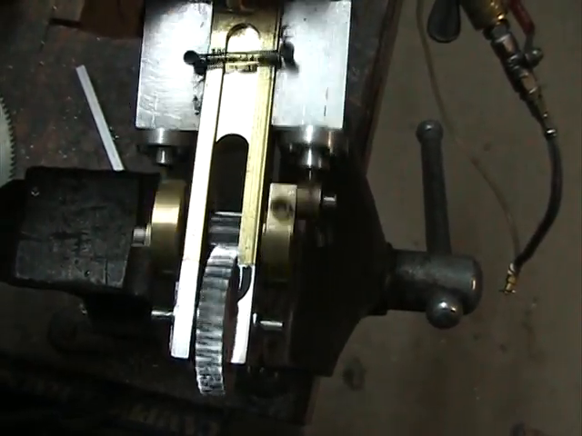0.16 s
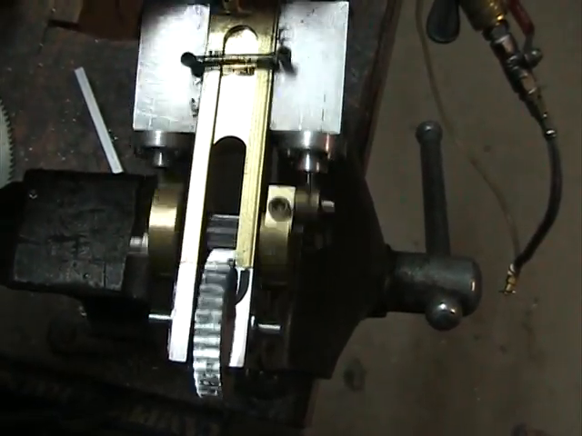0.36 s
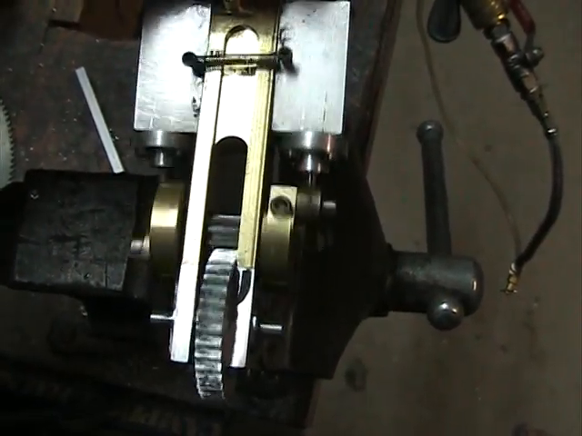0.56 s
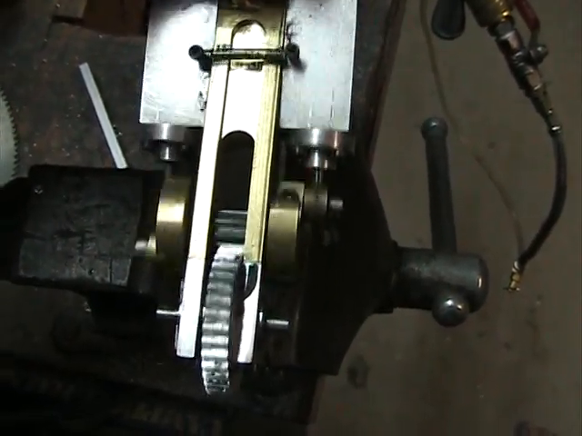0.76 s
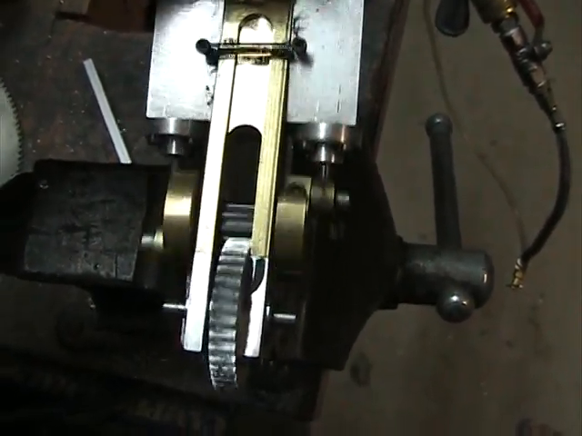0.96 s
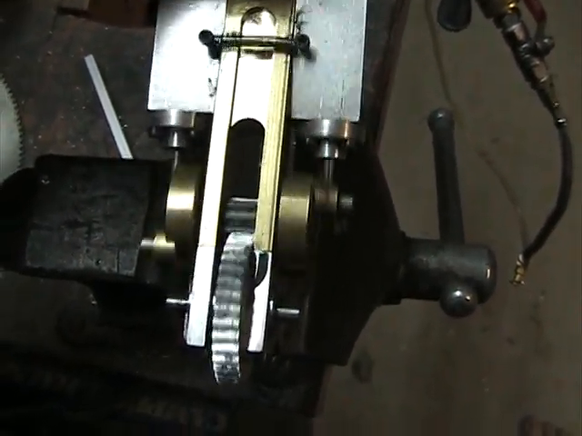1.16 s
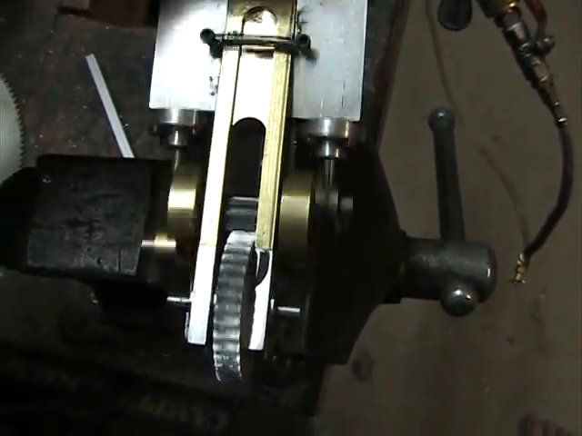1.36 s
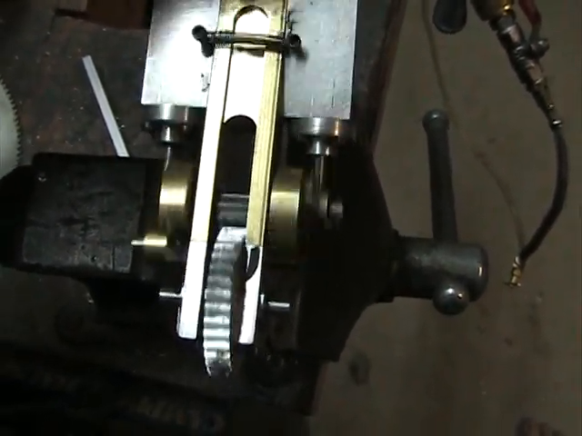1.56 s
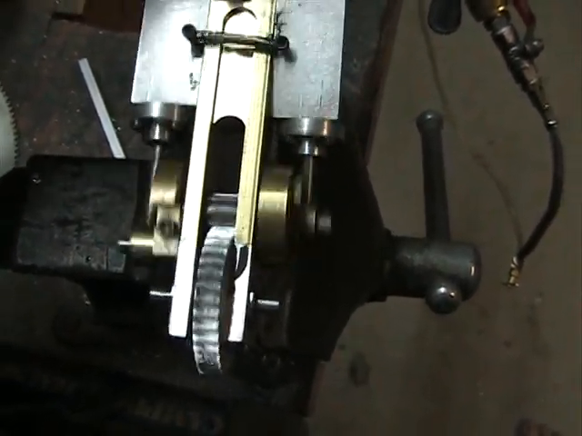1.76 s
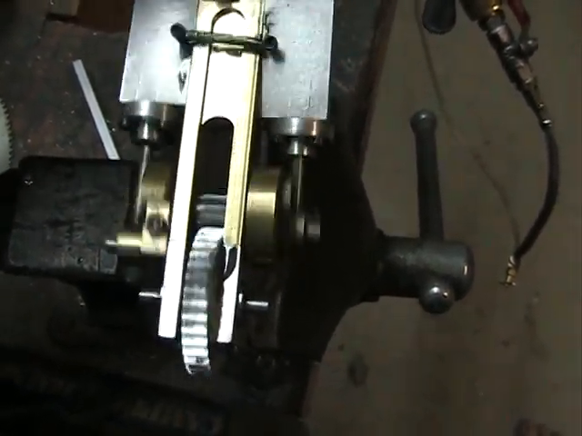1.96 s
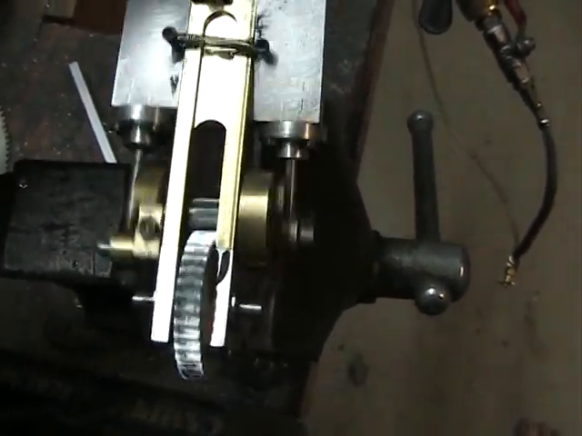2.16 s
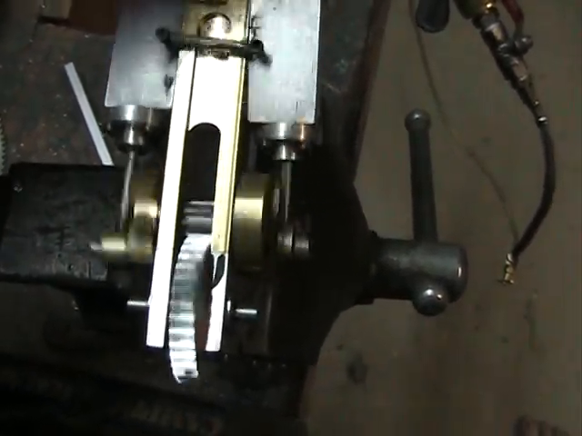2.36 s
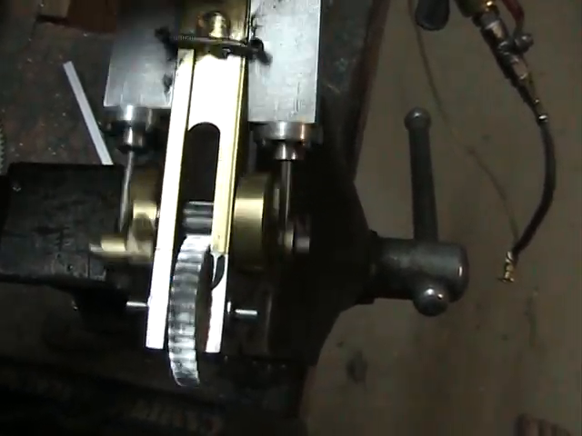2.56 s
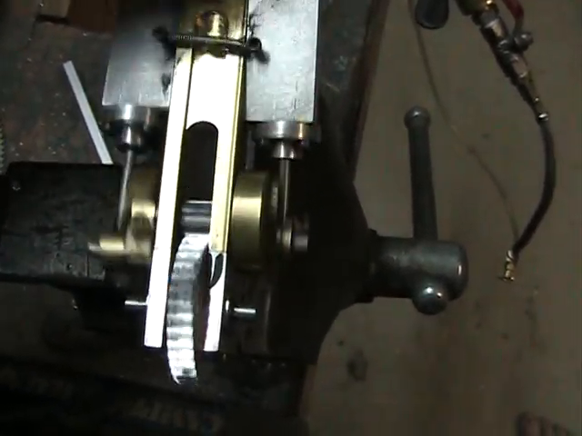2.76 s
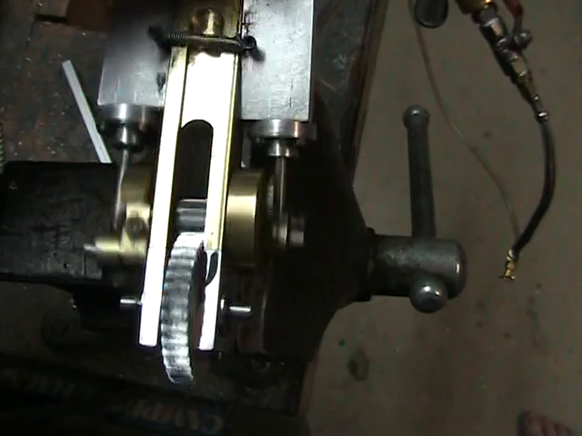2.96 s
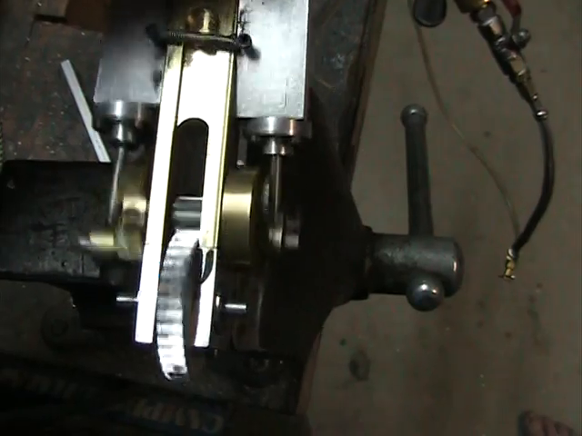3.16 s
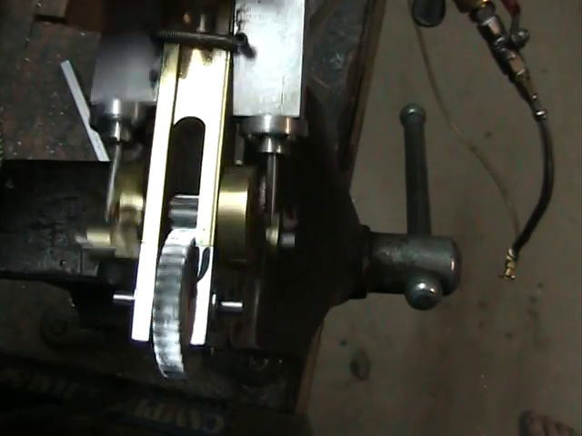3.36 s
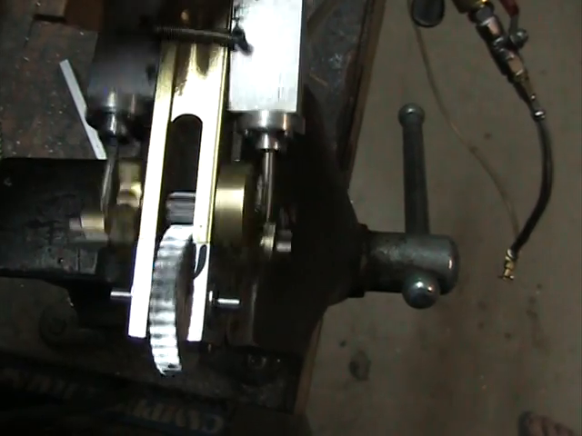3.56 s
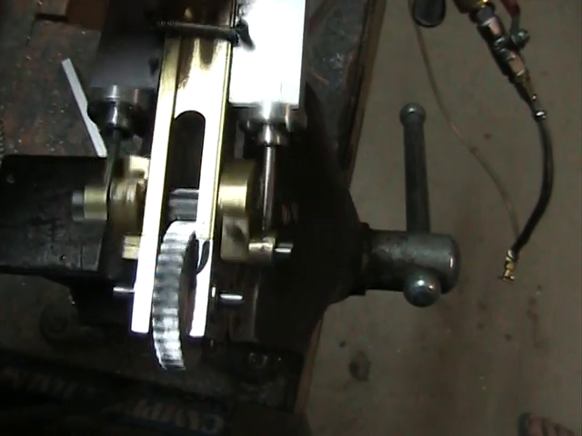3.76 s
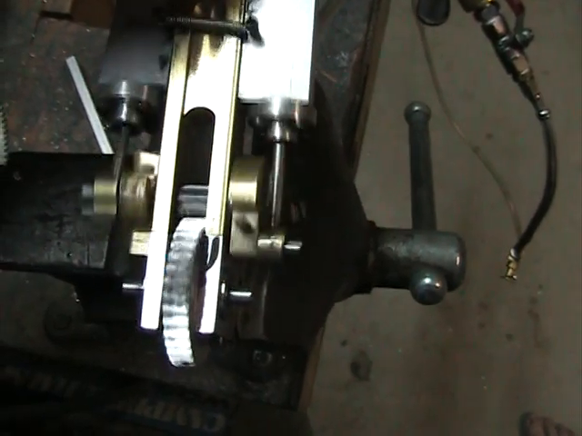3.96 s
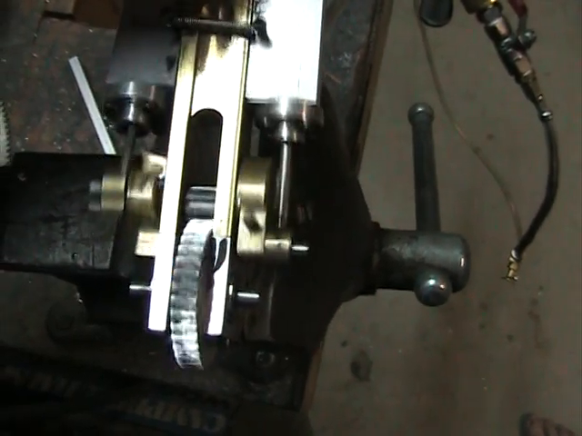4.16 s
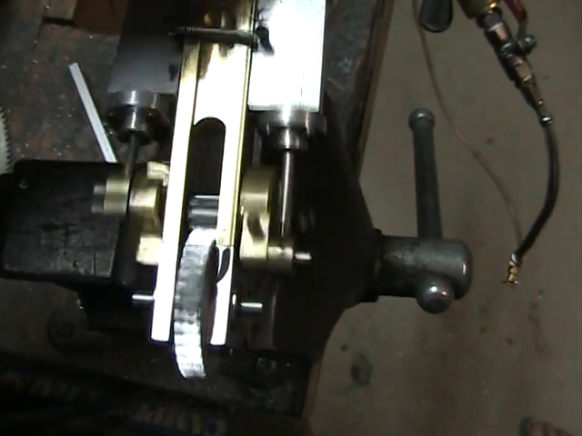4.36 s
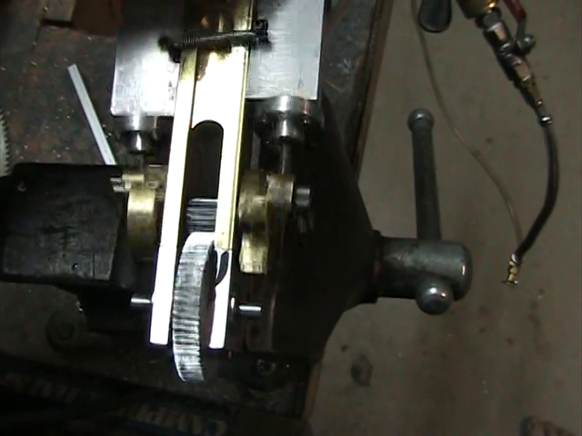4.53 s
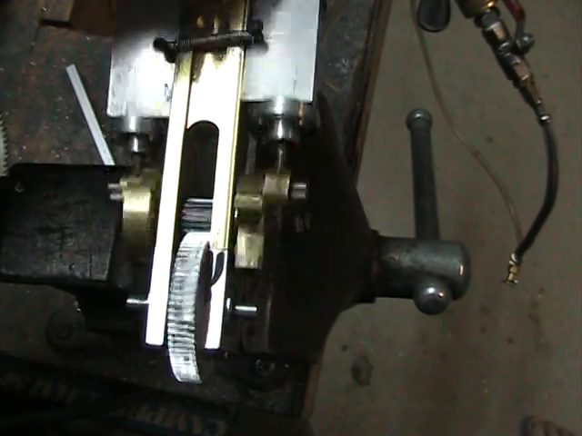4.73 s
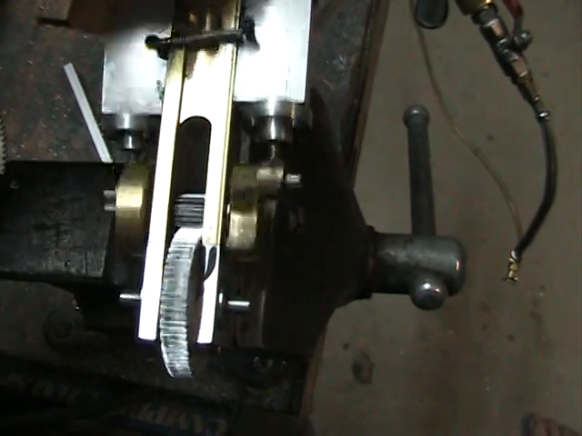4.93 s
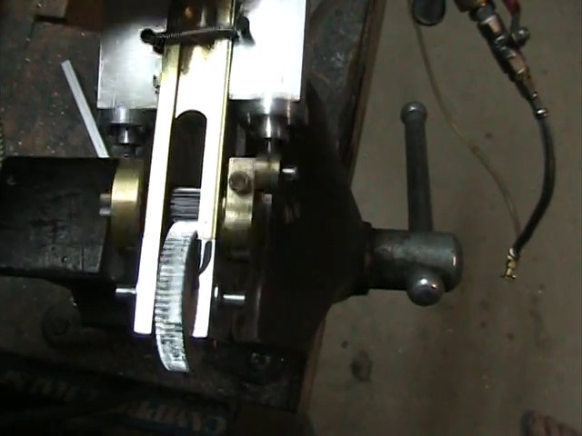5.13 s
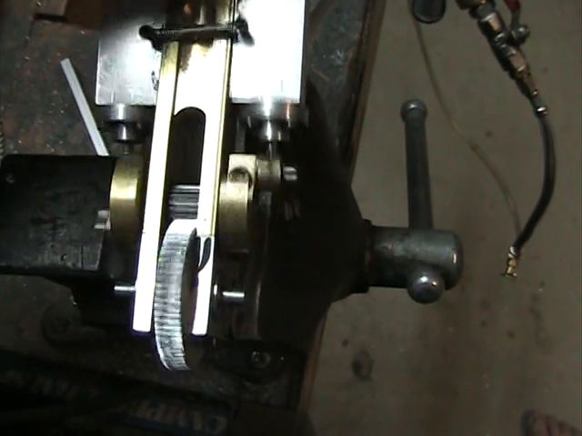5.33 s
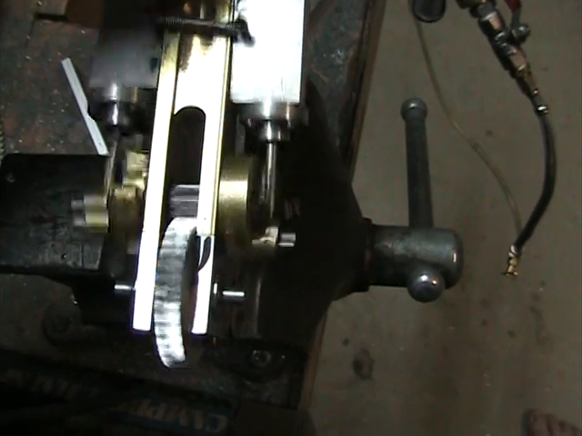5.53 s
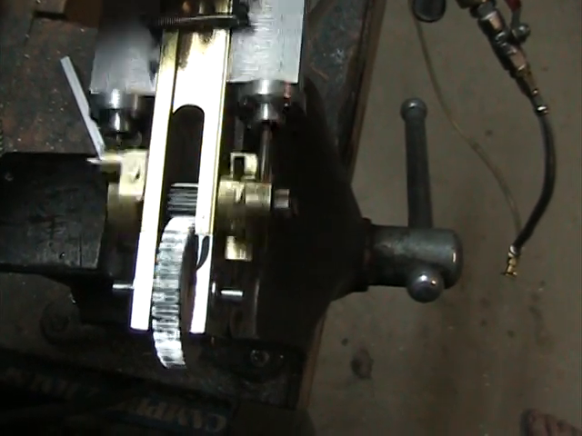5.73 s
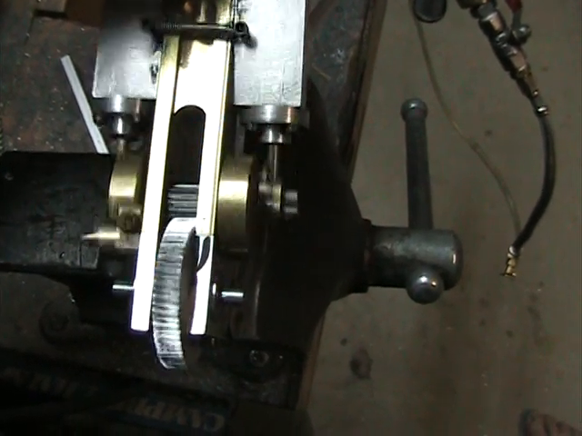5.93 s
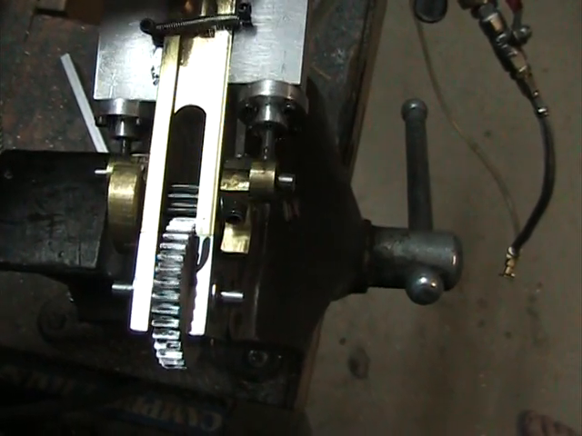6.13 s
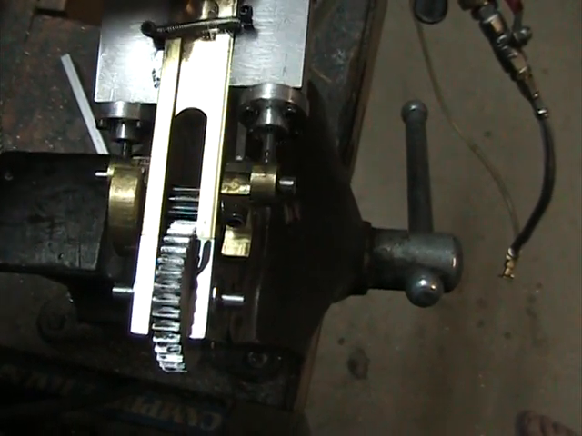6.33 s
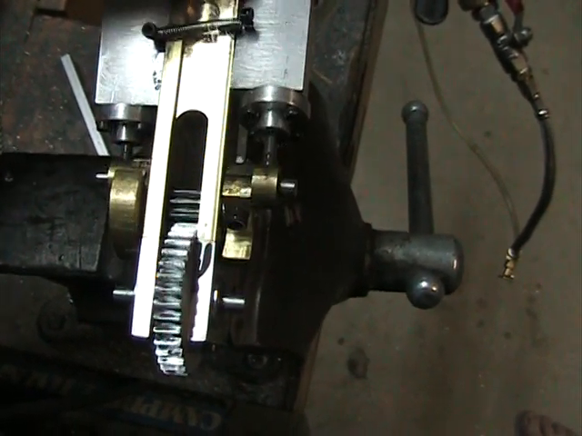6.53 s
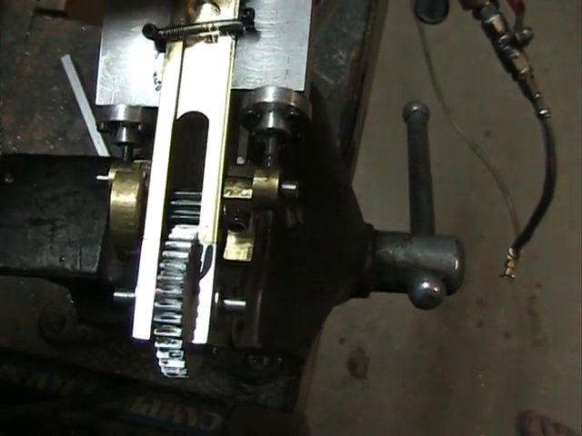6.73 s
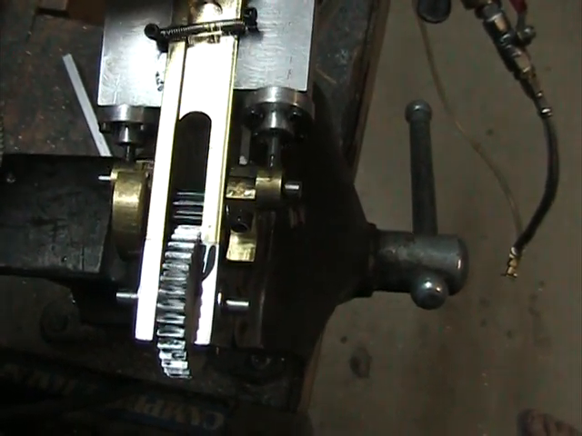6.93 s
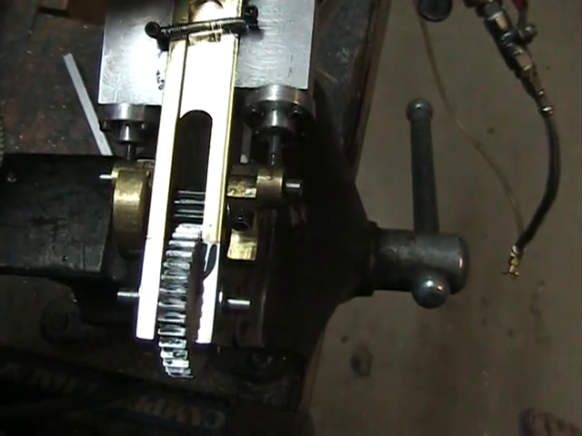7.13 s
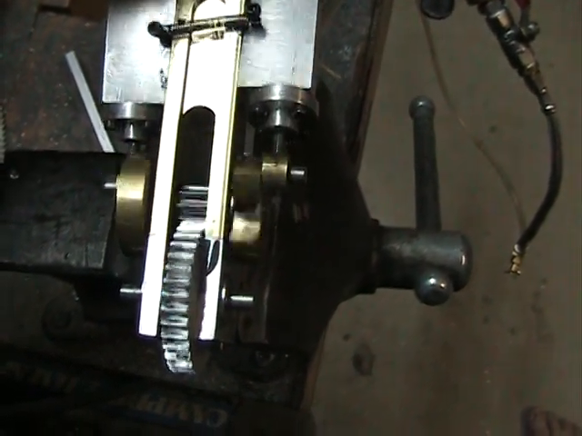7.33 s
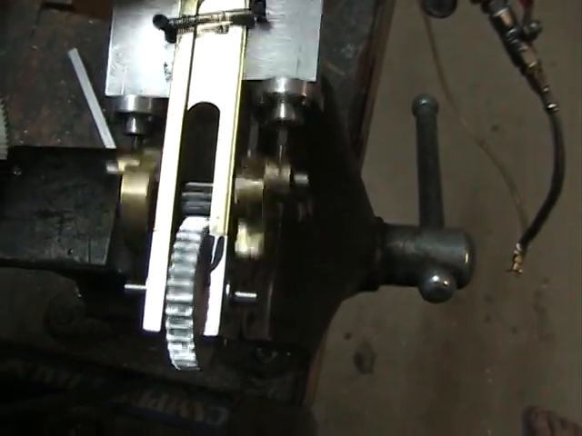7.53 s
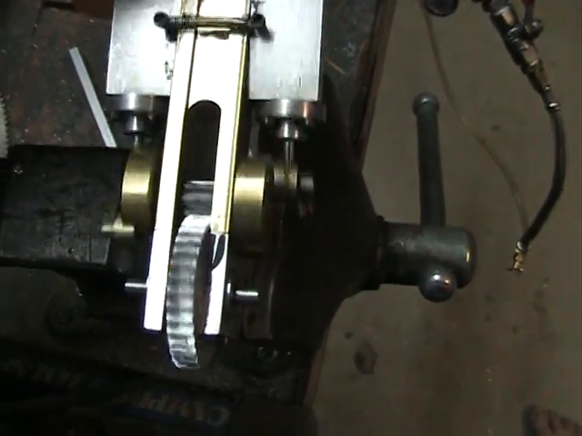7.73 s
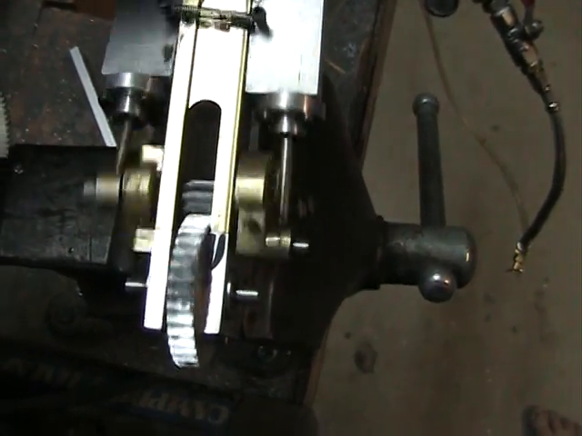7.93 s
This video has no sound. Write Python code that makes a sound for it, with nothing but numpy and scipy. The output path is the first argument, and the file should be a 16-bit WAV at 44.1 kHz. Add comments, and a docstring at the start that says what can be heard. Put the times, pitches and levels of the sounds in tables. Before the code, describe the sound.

A small engine runs on compressed air with rapid clacking and hissing, stalls briefly, then restarts with a louder hiss.

```python
"""A small twin-cylinder model engine, held in a vice in a humming workshop, runs on compressed air.
Air hisses from the valves; four strokes a turn drive the gear teeth through their backlash, so they
clack and thump the frame, and once a turn the engine rocks in the vice. Airy whistles come and go.
Near 6 s the air is turned down and the engine stalls, leaving a trickle through the ports. At 7.2 s
the tap is opened wide: the ports hiss loudly and sing for a moment, and the engine runs faster."""
import sys
import numpy as np
from scipy import signal
from scipy.fft import rfft, irfft
from scipy.io import wavfile
from scipy.ndimage import uniform_filter1d

SR = 44100
rng = np.random.default_rng(int(sys.argv[2]) if len(sys.argv) > 2 else 0)


def digitize_waveform(pressure):
    """Quantize a signal to 16-bit integers and store it at the path in sys.argv[1].

    Rows of a 2-D input are taken as channels; values are limited to [-1, 1].
    """
    field = np.atleast_2d(pressure).T
    bounded = np.clip(field, -1, 1)
    quanta = np.round(bounded * 32767).astype(np.int16)
    wavfile.write(sys.argv[1], SR, quanta)


N = 356769

# Spectrum of the workshop noise: f/Hz, relative density/dB
SHOP_SPECTRUM = [(20, -32), (37, -9), (58, -10), (85, -12.5), (155, -7.5), (240, -4.5), (390, -3),
                 (550, -7), (1000, -12), (1800, -18), (2400, -19.5), (4000, -90)]
# Partials of the workshop hum: f/Hz, level/dB
HUM_PARTIALS = [(119, -64), (230, -54.5), (372, -57), (1002, -63)]
# Spectrum of the valve leak: f/Hz, relative density/dB
LEAK_SPECTRUM = [(400, -16), (800, -9.5), (1300, -5.5), (2100, -5), (3000, 1), (3600, 3), (4200, 0.5),
                 (4750, 0.6), (5500, -4), (7200, -4.5), (8500, -1), (9600, -3), (10800, -9.5), (13000, -12),
                 (14400, -9), (15500, -7), (16000, -3)]
# Envelope of the leak before the supply is turned down: t/s, level/dB
LEAK_LEVELS = [(0.0, -22), (1.63, -23), (2.05, -23.5), (5.44, -22.5), (5.75, -22.5)]
# Crank motion, nearly steady and then labouring to a stop: t/s, strokes done
FIRST_RUN_STROKES = [(.0296, 0), (1.4462, 14), (1.7539, 17), (2.3595, 23), (2.9581, 29), (3.4616, 34),
                     (3.6727, 36), (4.276, 42), (4.683, 46), (5.2001, 51), (5.4144, 53), (5.528, 54),
                     (5.7771, 56), (5.9158, 57)]
# Tooth contacts in one stroke: share of the stroke, clack offset/dB, thump offset/dB, scrape decay/s
TOOTH_CONTACTS = [(0, 1.6, -3, 0.0014), (.083, 0.3, -5.5, 0.0016), (.178, -2.5, -8, 0.0018),
                  (.272, -1.5, -13, 0.0027), (.388, -7, -14, 0.0015), (.51, -12, -9.5, 0.0005),
                  (.648, -12.5, -14.5, 0.00033), (.774, -22.5, -12, 0.00058), (.893, -6, -15, 0.0005)]
# The four strokes of a turn, two light and two heavy, in relative levels:
# first clack/dB, later clacks/dB, first thump/dB, later thumps/dB
TURN_LEVELS = [(-23.5, -22, -28.5, -28.5), (-19.5, -22.5, -28, -28.5), (-23.5, -22, -26.5, -24),
               (-21, -20, -24, -26.5)]
# Modes of the gear and brass parts: f/Hz, bandwidth/Hz, gain/dB
GEAR_RESONANCES = [(1600, 236, -4), (2460, 600, -3.5), (3430, 770, -0.5), (4770, 640, 0), (6250, 1140, -2),
                   (8380, 1570, 2.5), (9540, 1620, -0.5), (11340, 2400, -7), (13600, 900, -12),
                   (15500, 600, -11)]
# Modes of frame, vice and bench: f/Hz, bandwidth/Hz, gain/dB
FRAME_RESONANCES = [(115.3, 4.7, -4.5), (221, 33, -11.5), (268.6, 21, -4), (296.6, 18, -4.5), (402, 30, 3),
                    (442, 53, -3), (493, 24, 0.5), (534.6, 19.3, 5), (585.7, 9.4, 4.5), (642, 10.5, 0),
                    (712, 7.6, 1.5), (916, 68, -3), (999, 19, -9), (1002, 7.4, -1), (1031, 20, -5),
                    (1085.5, 10.7, 0), (1188, 76, -10), (1443, 31, -3.5), (1610, 43, -9.5),
                    (1728, 28, -3.5), (1966, 91, -9.5), (2284, 17, -3)]
# Half-whistles at the valves: start/s, end/s, f/Hz, resonator bandwidth/Hz, level/dB
VALVE_TONES = [(1.4, 2.2, 13000, 600, -47), (1.6, 1.8, 4750, 330, -43), (2.3, 2.8, 9800, 700, -38),
               (2.4, 5.1, 3500, 547, -40), (5.4, 6.12, 3450, 590, -29.5)]
# Steps by which the supply is turned down: t/s, duration/s, level change/dB
SUPPLY_STEPS = [(5.79, .07, -2), (5.95, 0.18, -12.5), (6.6, 0.053, -6.5)]
# Spectrum of the jet through the ports: f/Hz, relative density/dB
JET_SPECTRUM = [(530, -22), (900, -18.5), (1100, -19), (1390, -11.5), (1570, -7.5), (1880, -9), (2300, -3),
                (3590, -1), (5610, -3), (7490, -5), (8550, 2), (9530, 0), (10400, -4.5), (15200, -9.5),
                (16000, -38)]
# Tones of the ports during the surge: f/Hz, resonator bandwidth/Hz, level against the flow/dB
SURGE_TONES = [(3150, 1900, -4), (8500, 1300, -5)]
# Crank motion picking up on full air: t/s, strokes done
RESTART_STROKES = [(7.4006, 0), (7.5031, 1), (7.6725, 3), (7.7678, 4), (8.0229, 7)]
# Coherence of the noise between the channels: f/Hz, left-right correlation
STEREO_COHERENCE = [(40, .85), (130, .88), (300, .97), (2200, .97), (4500, .93), (5500, .7), (7500, .95),
                    (8800, .9), (9900, .4), (12000, .75)]
# Stereo spread of the top hiss, where above 10 kHz the left channel leads the right: f/Hz, lead/rad
TREBLE_LEAD = [(100, 0), (10200, 0), (10900, 1.35), (13000, 1.3), (16000, .9)]
# Level difference between the channels: f/Hz, left over right/dB
STEREO_BALANCE = [(60, 1.5), (120, 3), (240, 2.1), (480, 0.7), (950, 2.4), (1890, 1.5), (3770, 0),
                  (7520, -0.4), (15000, -1.1)]

STALL_S, TAP_OPENS_S, TAP_TURN_S = 6.05, 7.17, 0.21
TIME = np.arange(N) / SR


def from_db(db):
    """Amplitude ratio of a level in decibels."""
    return 10 ** (np.asarray(db) / 20)


def rms_one(x):
    """Normalisation to unit mean power."""
    return x / np.sqrt(np.mean(x ** 2) + 1e-20)


def pan(db):
    """Left and right gains for an interchannel level difference."""
    return from_db(db / 2 * np.array([[1], [-1]]))


def per_bin(points):
    """Interpolation of (f/Hz, value) points over the whole spectrum, in log frequency."""
    hz, value = np.transpose(points)
    return np.interp(np.log(np.arange(N // 2 + 1) * SR / N + 1), np.log(hz), value)


def drift(rate_hz, hop=40):
    """Slow random modulation: low-passed noise of unit spread."""
    pole = np.exp(-2 * np.pi * rate_hz * hop / SR)
    slow = signal.lfilter([1], [1, -2 * pole, pole * pole], rng.standard_normal(N // hop + 2002))[2000:]
    return np.interp(np.arange(N) / hop, np.arange(len(slow)), rms_one(slow))


def air_noise(spectrum):
    """Partially coherent stereo noise of a given spectrum, at rms 1."""
    mid, side = rfft(rng.standard_normal((2, N)))
    coherence = per_bin(STEREO_COHERENCE)
    pair = np.sqrt(1 + coherence) * mid + np.sqrt(1 - coherence) * side * [[1], [-1]]
    return rms_one(irfft(pair * from_db(per_bin(spectrum)), N))


def split(x, hz):
    """Complementary filtering: the parts below and above a frequency."""
    low = signal.sosfiltfilt(signal.butter(3, hz, fs=SR, output="sos"), x)
    return low, x - low


def resonance(x, hz, width_hz):
    """A damped oscillator driven by x, with unit gain at resonance."""
    radius = np.exp(-np.pi * width_hz / SR)
    feedback = [1, -2 * radius * np.cos(2 * np.pi * hz / SR), radius ** 2]
    return signal.lfilter(np.array([1, 0, -1]) * (1 - radius ** 2) / 2, feedback, x + 1e-18)


def ring(x, modes):
    """Modal superposition: a body's resonances add, with alternating signs."""
    return sum((-1) ** k * from_db(db) * resonance(x, hz, width_hz)
               for k, (hz, width_hz, db) in enumerate(modes))


def clicks(times, gains):
    """Ideal impulses, one sample long."""
    at = np.round(times * SR).astype(int)
    inside = (at >= 0) & (at < N)
    return np.bincount(at[inside], gains[inside], N)


def scrapes(times, db, rise_s, decay_s, grain_db):
    """Friction of rough surfaces: a gritty burst at each time, its energy set by db."""
    age = np.arange(SR // 80) / SR
    white, grain = rng.standard_normal((2, len(times), len(age)))
    envelope = np.exp(-age / decay_s) * (1 - np.exp(-age / rise_s)) ** 2
    grit = white * from_db(grain_db * grain) * envelope
    grit *= (from_db(db) / np.linalg.norm(grit, axis=1))[:, None]
    return clicks((times[:, None] + age).ravel(), grit.ravel())


def workshop_background(noise_db=-40.5, waver_db=4, wander_rad=1):
    """Dull noise lies under a hum that wavers by amplitude and phase modulation."""
    hum = 0
    for hz, db in HUM_PARTIALS:
        amplitude = np.sqrt(2) * from_db(db + waver_db * drift(2.1))
        hum += amplitude * np.sin(2 * np.pi * hz * TIME + wander_rad * drift(1.75))
    return from_db(noise_db) * air_noise(SHOP_SPECTRUM) + hum


def valve_leak(gain_db=-0.2, flutter_db=1.32, flicker_db=0.2):
    """Turbulence of air escaping past the valves: a flickering hiss that falls with the supply."""
    dull, bright = split(air_noise(LEAK_SPECTRUM), hz=5900)
    hiss = dull * from_db(flicker_db * drift(4.9)) + bright * from_db(flicker_db * drift(18))
    drop_db = sum(db * np.clip((TIME - start) / length_s, 0, 1) for start, length_s, db in SUPPLY_STEPS)
    flow_db = np.interp(TIME, *np.transpose(LEAK_LEVELS)) + drop_db
    return hiss * pan(db=0.2) * from_db(gain_db + flow_db + flutter_db * drift(42))


def stroke_times(run):
    """Crank kinematics: the instant at which each whole stroke is reached."""
    times, done = np.transpose(run)
    return np.interp(np.arange(done[-1] + 1), done, times)


def tooth_contacts(run, gain_db=0, last_fade_db=0, jitter_s=0.0002, steady_strokes_per_s=9.3):
    """Backlash: teeth collide in each stroke, further apart and clacking less as the crank slows."""
    starts = stroke_times(run)
    share, tooth_clack_db, tooth_thump_db, scrape_s = np.transpose(TOOTH_CONTACTS)
    period = np.diff(starts, append=2 * starts[-1] - starts[-2])[:, None]
    times = starts[:, None] + period * share + jitter_s * rng.standard_normal((len(starts), len(share)))
    stroke_levels = np.array(TURN_LEVELS)[np.arange(len(starts)) % len(TURN_LEVELS)]
    first_clack, later_clacks, first_thump, later_thumps = stroke_levels.T[:, :, None]
    fade_db = last_fade_db * (starts == starts[-1])[:, None] * share
    force_db = gain_db + fade_db + rng.normal(0, 0.47, (len(starts), 1))  # no two strokes are alike
    slow_db = 4 * np.log2(np.minimum(1 / (period * steady_strokes_per_s), 1))  # 4 dB an octave of speed
    first = np.arange(len(share)) == 0
    clack_db = np.where(first, first_clack, later_clacks) + tooth_clack_db + force_db + slow_db
    thump_db = np.where(first, first_thump, later_thumps) + tooth_thump_db + force_db
    decay_s = scrape_s * 2 ** rng.normal(0, 0.2, times.shape)  # some teeth land crisply, others drag
    return np.array([times.ravel(), clack_db.ravel(), thump_db.ravel(), decay_s.ravel()])


def gear_clacks(times, db, scrape_s, gain_db=33, rattle_db=-6):
    """Impact excitation: each tooth lands with a scrape that rings the gear; slack pins tick between."""
    db = db + gain_db + rng.normal(0, 1.3, len(times))
    teeth = scrapes(times, db, rise_s=0.00008, decay_s=scrape_s[:, None], grain_db=1.5)
    pin_times = times + rng.uniform(0, 0.011, len(times))
    pin_db = uniform_filter1d(db, size=len(TOOTH_CONTACTS)) + rng.normal(rattle_db, 3, len(times))
    pins = scrapes(pin_times, pin_db, rise_s=0.00005, decay_s=0.00063, grain_db=4.5)
    return ring(teeth + pins, GEAR_RESONANCES)


def frame_thumps(times, db, knock_db=51.5, ring_db=47, delay_s=0.003405, loose_s=0.00202, soft_db=7):
    """Structure-borne sound: a tooth taking the load shoves the frame, which knocks and shudders."""
    slack = np.clip((db.max() - db) / 20, 0, 1) ** 2  # lightly loaded teeth bear softly and less exactly
    times = times + loose_s * slack * rng.standard_normal(len(times))
    shove_db = db + knock_db - soft_db * slack + rng.normal(0, 0.3, len(times))
    shoves = clicks(times + delay_s, from_db(shove_db))
    band = signal.butter(2, [390, 655], "band", fs=SR, output="sos")
    knock = signal.sosfilt(band, signal.sosfilt(band, shoves + 1e-18))
    friction = scrapes(times, db + ring_db, rise_s=0.0011, decay_s=0.0053, grain_db=1)
    return knock + ring(friction, FRAME_RESONANCES)


def reverberate(x, wet_db, t60_s=0.17, first_echo_s=0.002):
    """Reverberation: dense reflections from bench and walls decay exponentially, unlike at each side."""
    age = np.arange(SR // 2) / SR
    tail = rng.standard_normal((2, len(age))) * from_db(-60 * age / t60_s) * (age > first_echo_s)
    tail /= np.linalg.norm(tail, axis=1, keepdims=True)
    return x + from_db(wet_db) * signal.fftconvolve(x[None], tail, axes=1)[:, :N]


def vice_rock(push_db=24.5, delay_s=0.01204):
    """Resonance: until the stall, the hardest stroke of each turn sets the engine booming in the vice."""
    times = stroke_times(FIRST_RUN_STROKES)[2::len(TURN_LEVELS)] + delay_s
    pushes = clicks(times, from_db(rng.normal(push_db, 0.47, len(times))))
    return resonance(pushes, hz=117.8, width_hz=3.5)


def airy_tone(turbulence, hz, width_hz, flutter_db):
    """Resonant filtering narrows turbulence to an unsteady half-whistle."""
    narrow = resonance(resonance(turbulence, hz, width_hz), hz, width_hz)
    return rms_one(narrow) * from_db(flutter_db * drift(15))


def valve_whistles(turbulence):
    """Edge tones: air grazing the valves gives half-whistles that swell and fade."""
    whistles = 0
    for start, end, hz, width_hz, db in VALVE_TONES:
        swell = np.sin(np.pi * np.clip((TIME - start) / (end - start), 0, 1))
        whistles += swell * from_db(db) * airy_tone(turbulence, hz, width_hz, flutter_db=2)
    return whistles


def surge(fade_s):
    """Pressure relaxation: 1 until the tap is fully open, then decaying as the hose pressure is spent."""
    return np.exp(-np.maximum(TIME - TAP_OPENS_S - TAP_TURN_S, 0) / fade_s)


def port_flow(trickle_db=-44, full_air_db=-20, surge_db=2):
    """Throttling, as a gain: a trickle from the stall on swells with the tap, overshoots and settles."""
    opening = np.sin(np.pi / 2 * np.clip((TIME - TAP_OPENS_S) / TAP_TURN_S, 0, 1)) ** 1.32
    open_db = full_air_db + surge_db * surge(fade_s=0.23)
    return (TIME > STALL_S) * from_db(trickle_db + opening * (open_db - trickle_db))


def throb(lag, depth_db):
    """Amplitude modulation once a stroke of the restart, peaking `lag` strokes after the first clack."""
    starts = stroke_times(RESTART_STROKES)
    starts = np.r_[2 * starts[0] - starts[1], starts, 2 * starts[-1] - starts[-2]]
    phase = np.interp(TIME, starts, np.arange(len(starts)))
    return from_db(depth_db * (TIME > starts[0]) * np.cos(2 * np.pi * (phase - lag)))


def port_jet(gain_db=2.03, flutter_db=0.94):
    """Jet noise: an open port puffs dully; as it closes, the narrowing jet sizzles."""
    puff, treble = split(air_noise(JET_SPECTRUM), hz=2400)
    rush, sizzle = split(treble, hz=10500)
    jet = (puff * throb(lag=-0.046, depth_db=2.5)
           + rush * throb(lag=0.17, depth_db=0.4)
           + sizzle * throb(lag=0.32, depth_db=2.5))
    return jet * port_flow() * pan(db=-0.3) * from_db(gain_db + flutter_db * drift(60))


def port_whistles(turbulence):
    """Edge tones: the ports sing while the first surge blows through them."""
    tones = sum(from_db(db) * airy_tone(turbulence, hz, width_hz, flutter_db=0.5)
                for hz, width_hz, db in SURGE_TONES)
    return tones * port_flow() * surge(fade_s=0.13) * (TIME > TAP_OPENS_S)


def scene():
    """Superposition of the background, the air and the engine's impacts with their reflections."""
    first_run = tooth_contacts(FIRST_RUN_STROKES, last_fade_db=-8.5)
    restart = tooth_contacts(RESTART_STROKES, gain_db=-3.5)  # the gear runs more smoothly on full air
    times, clack_db, thump_db, scrape_s = np.hstack([first_run, restart])
    clacks = reverberate(gear_clacks(times, clack_db, scrape_s), wet_db=-12.5)
    thumps = reverberate(frame_thumps(times, thump_db), wet_db=-17.5)
    hiss = valve_leak() + port_jet()
    turbulence = air_noise(JET_SPECTRUM)
    whistles = valve_whistles(turbulence) + port_whistles(turbulence)
    return workshop_background() + hiss + clacks + thumps + vice_rock() + whistles


def record(dry, low_hz=30, high_hz=15900):
    """Left and right differ in level, and above 10 kHz in phase; band limiting and saturation follow."""
    response = np.exp(0.5j * per_bin(TREBLE_LEAD) * [[1], [-1]]) * pan(per_bin(STEREO_BALANCE))
    heard = irfft(rfft(dry) * response, N)
    rumble_cut = signal.butter(4, low_hz, "high", fs=SR, output="sos")
    treble_cut = signal.ellip(12, 0.3, 90, high_hz, fs=SR, output="sos")
    rounded = np.tanh(signal.sosfilt(rumble_cut, heard))
    return signal.sosfilt(treble_cut, rounded)


dry = scene()
out = record(dry)
digitize_waveform(out)
```